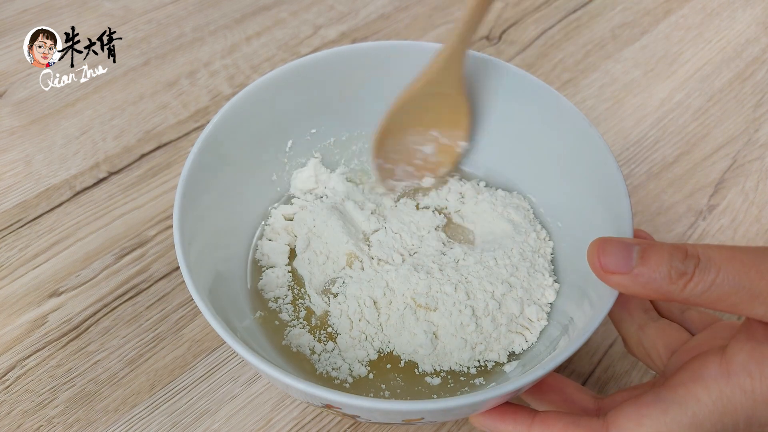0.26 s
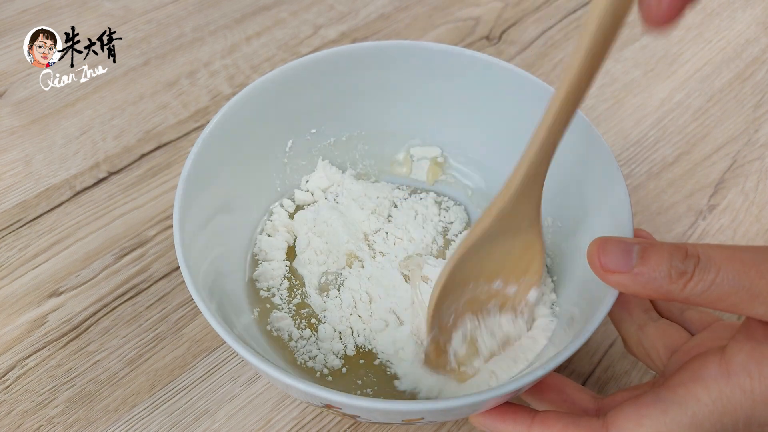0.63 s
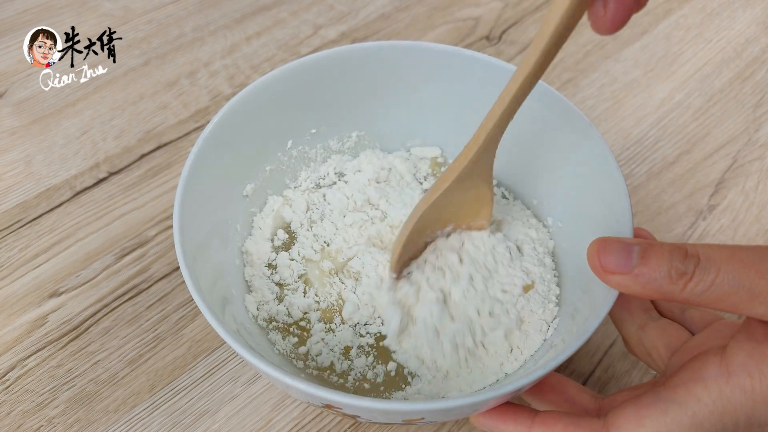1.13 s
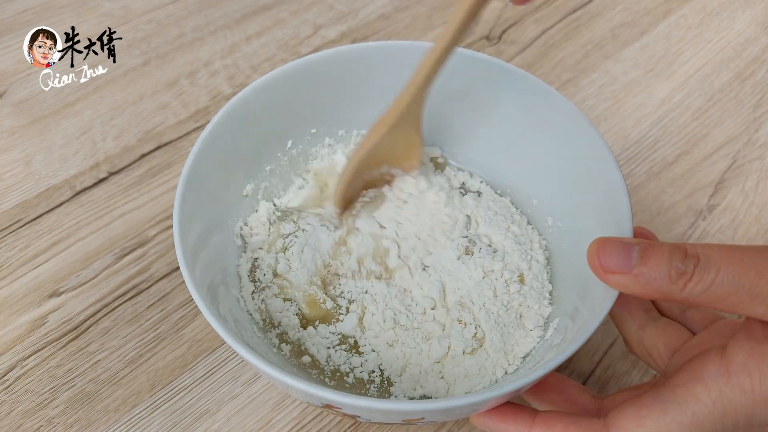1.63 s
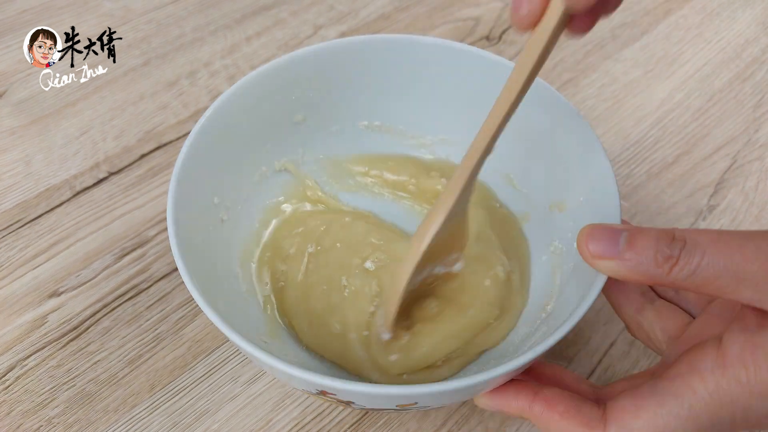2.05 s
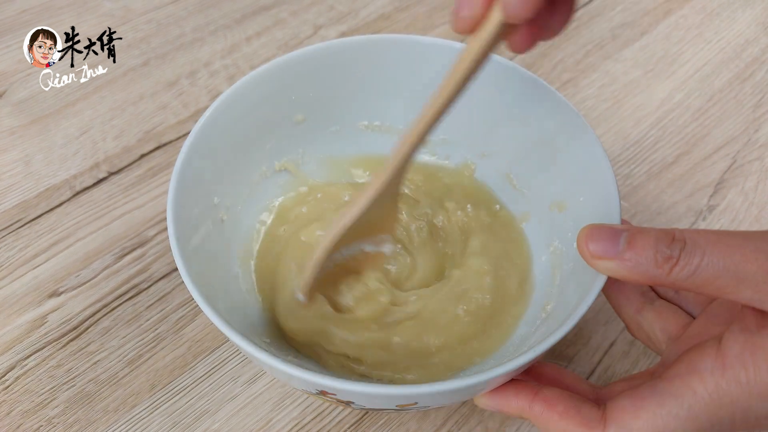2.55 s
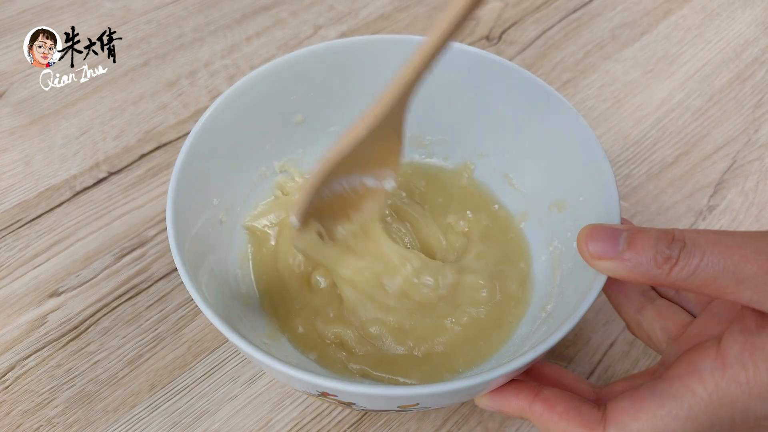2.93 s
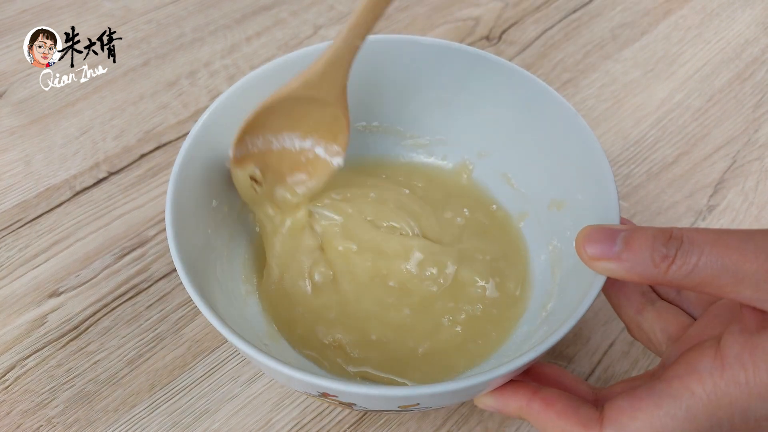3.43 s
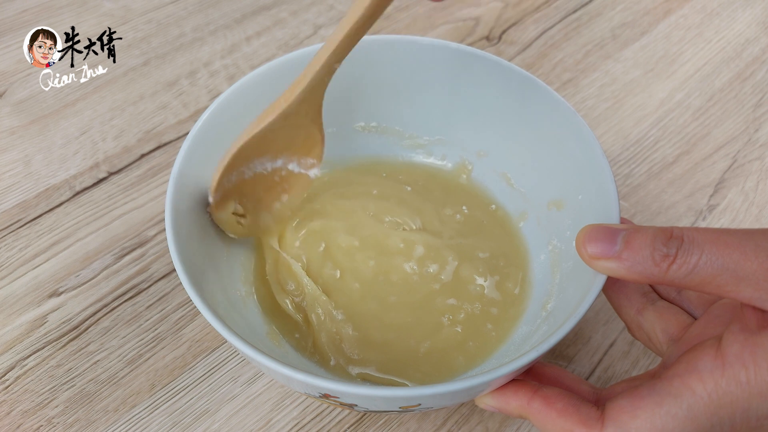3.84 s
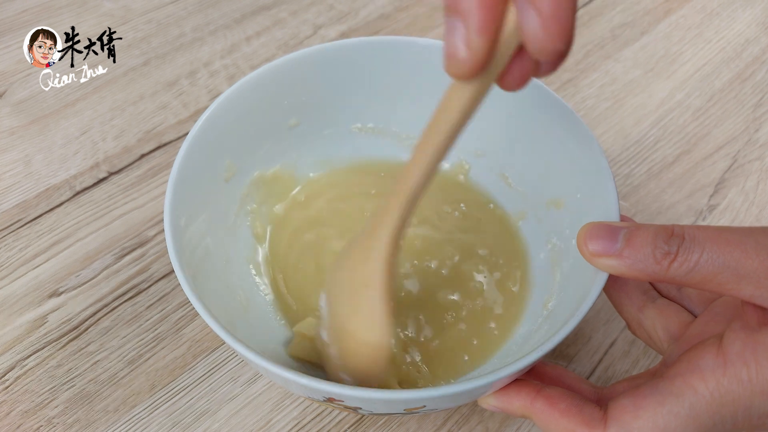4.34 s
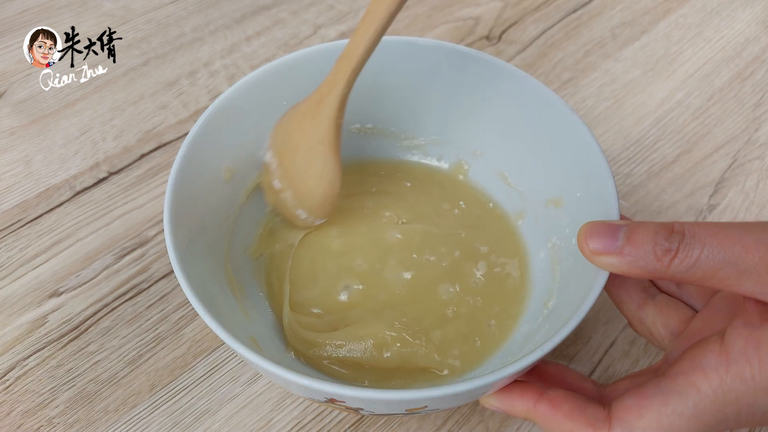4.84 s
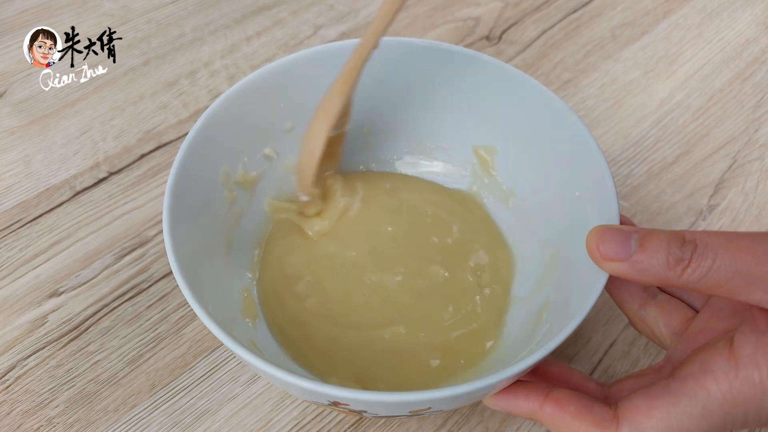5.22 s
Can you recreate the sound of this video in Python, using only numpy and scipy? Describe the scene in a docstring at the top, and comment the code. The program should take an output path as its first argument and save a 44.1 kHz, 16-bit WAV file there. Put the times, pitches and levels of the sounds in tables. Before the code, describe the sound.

A wooden spoon stirs flour into oil in a ceramic bowl, close by, over a faint kitchen hum. Quick gritty scrapes come first, with a light double tap. Then the mixture turns to paste, giving tiny wet pops, while the spoon knocks now and then on the bowl's wall. The stirring slows to longer folding strokes, and the hardest knock falls shortly before the end.

```python
"""A wooden spoon stirs flour into oil in a ceramic bowl on a wooden table, in a humming kitchen.
From the start, quick strokes grind grit on the glaze; stick-slip friction rings spoon, bowl and table.
A light double tap follows, then the first of scattered knocks on the bowl's wall, low thumps and catches.
From about 2 s small bubbles pop in the paste. Near 3 s the stirring slows to folding, with two brief
hums under the drag, and the hardest knock falls shortly before the end."""
import sys
import numpy as np
from scipy import signal
from scipy.io import wavfile
from scipy.ndimage import uniform_filter1d

SR = 44100
rng = np.random.default_rng(int(sys.argv[2]) if len(sys.argv) > 2 else 0)


def bounce(signal):
    """Save signal as a 16-bit WAV file at the path given by the first command-line argument."""
    frames = np.transpose(np.atleast_2d(signal))
    limited = np.clip(frames, -1, 1)
    pcm = np.round(limited * 32767).astype(np.int16)
    wavfile.write(sys.argv[1], SR, pcm)


N = 241403
TIME = np.arange(N) / SR
CONTROL_TIME = TIME[::16]
SLOW_FROM_S, PASTE_FROM_S = 2.95, 2.1

# Kitchen noise spectrum: (frequency [Hz], relative density [dB])
KITCHEN_SPECTRUM = [(34, -1), (52, 18), (61, 5), (161, -4), (362, 3), (483, -1.5), (981, -2.5), (1700, -10),
                    (7010, -12.5), (12800, -17.5), (15800, -20.5)]
# Strokes on the glaze: (time [s], hold [s], grit level [dB], rise [ms], swell over the hold [dB],
# blade [dB re grit], table [dB re grit], bowl [dB re grit], treble tilt [dB/octave], rasp [Hz])
STROKES = [(0.025, 0.079, -32.5, 120, -2.5, -6, -13, -27, 1.5, 4000),
           (0.329, 0.078, -45, 15, 9, -18, -16, -32, 4.5, 4800),
           (0.479, 0.061, -40, 270, -0.5, -8, -19, -25, -0.5, 3400),
           (0.82, 0.047, -35, 9.6, 1, -8.5, -12.5, -25, -0.5, 5140),
           (1.181, 0.037, -27, 78, -2, -9, -13.5, -34, -2, 3680),
           (1.464, 0.025, -34.5, 33, 4, -8.5, -9, -39, 0.5, 3850),
           (1.796, 0.056, -28, 100, 4, -6, -13.5, -21, -0.5, 4100),
           (2.008, .016, -42, 5, 1.5, -11, -21, -40, -4, 2970),
           (2.203, 0.021, -28.5, 16.4, -3, -1.5, -7, -25, -1, 4140),
           (2.508, 0.031, -33, 3.3, -0.5, 3.5, -14, -11, -2.5, 3980),
           (2.555, 0.025, -36, 30, 4.5, -7, -2.5, -22, -4.5, 4350),
           (2.602, 0.23, -44, 37, -14.5, 2, -3, -9, -3, 4200),
           (2.889, 0.05, -26, 3.8, -4, -6.5, -9.5, -21, -2.5, 3840),
           (2.97, 0.27, -45, 70, -1.5, -40, -6, -24, -11.5, 4300),
           (3.259, 0.094, -29.5, 60, -2.5, -9, -23, -29, -8.5, 4400),
           (3.392, 0.037, -28.5, 110, -2.5, -5, -15, -9, -1.5, 5500),
           (3.444, 0.2, -38.5, 73, 2, -40, 2, -20, -8.5, 4500),
           (3.659, 0.15, -27.5, 63, 1, -3.5, -35, -26, -2.5, 3970),
           (3.863, 0.12, -36, 220, -8, -37, -22, -29, -5.5, 4100),
           (3.979, .22, -33.5, 4, 4.5, 0, -11, -17, -1.7, 3140),
           (4.393, 0.025, -43.5, 16, -1.5, -12, -3, -16, 0, 5400),
           (4.435, 0.12, -33.5, 65, -5, -0.5, -13.5, -19, -0.7, 4530),
           (4.566, 0.027, -38.5, 71, 2.5, -7, -14, -1.5, -2, 5950),
           (4.801, 0.057, -29, 1.2, -1, -25, -0.5, -26, -2, 4030),
           (4.945, 0.13, -29, 127, -0.5, -6.5, -24, -36, 0.3, 5340),
           (5.087, 0.018, -31.5, 220, -1, -16, -16.5, -3, -5.5, 4170),
           (5.304, 0.079, -42, 16, 2, -40, -3.5, -11, -6, 3940),
           (5.391, 0.11, -31.5, 47, 11, -7.5, -15.5, -13, -0.4, 4000)]
# Friction noise spectrum: (frequency [Hz], relative density [dB])
GRIT_SPECTRUM = [(300, -16), (550, -10.5), (1100, -11.5), (2900, -8.5), (3800, -7), (5400, -5),
                 (7200, -1.5), (8100, -4), (9200, -10), (11500, -8.5), (14500, -16), (15800, -18),
                 (16100, -52)]
# Spoon modes, one of the handle, then two of the blade: (frequency [Hz], bandwidth [Hz], level [dB])
SPOON_MODES = [(1050, 267, 7), (1672, 192, 2), (1962, 178, 0.5)]
# Modes of bowl, table top and the table swaying on its legs: (frequency [Hz], level [dB], t60 [s])
BOWL_MODES = [(921, 0, 0.17), (931, -3, 0.17), (2252, -11, 0.3), (3930, 1, 0.36), (3940, 0, 0.36),
              (4790, -5, .12), (5940, -2, 0.045)]
TABLE_MODES = [(226, 0, 0.17), (259, -7, 0.25), (291, 0, 0.22), (366, -9, 0.07), (543, -6, 0.09),
               (730, -11, .06)]
LEG_MODES = [(68.6, 1, 0.25), (132.5, 2, 0.12), (162.3, -7.5, 0.37)]
# Reverberation time of the room: (frequency [Hz], t60 [s])
ROOM_DECAY = [(1000, 0.22), (12000, 0.05)]
# A contact and its bounce: (time [s], peak level [dB])
TAPS = [(0.2877, -24.5), (0.29, -24)]
# Modes rung by a tap: (frequency [Hz], level [dB], t60 [s])
TAP_MODES = [(1120, -0.81, 0.022), (3470, -0.68, 0.014)]
# Spoon impacts: (time [s], spoon peak [dB], table peak [dB], bowl peak [dB], legs peak [dB], contact [ms])
KNOCKS = [(0.33, -35, -38, -63, -31.5, 0.21), (2.006, -34, -59, -37.5, -59, 0.32),
          (2.206, -19, -30.5, -47, -27.5, 0.18), (2.512, -18, -21, -50, -22.5, 0.17),
          (2.891, -30, -25, -54, -24.5, 0.48), (2.9877, -13.5, -41, -56, -38, 0.18),
          (3.519, -28, -7.5, -34, -40, 0.51), (3.9811, -23, -20.5, -23, -42, 0.15),
          (4.802, 2, -13.5, -13, -30, 0.13), (5.107, -21, -53, -53, -46, 0.24),
          (5.303, -25, -37, -71, -42, 0.75)]
# Low thumps: (time [s], peak level [dB], frequency [Hz])
THUMPS = [(0.344, -24.5, 59), (2.821, -29, 60), (5.19, -27, 60)]
# Jolts of the blade as its edge catches: (time [s], peak level [dB])
CATCHES = [(1.1868, -18), (1.2255, -33), (2.2179, -20), (2.574, -24), (2.5839, -20.5), (2.8894, -21),
           (2.916, -15.5), (3.7713, -13), (4.1696, -15)]
# Mean rate of faint bubble bursts: (time [s], rate [1/s])
FIZZ_RATE = [(1.95, 0.47), (2.05, 146), (3.3, 220), (3.6, 10)]
# Distinct bubble bursts: (time [s], peak level [dB], frequency [Hz], rise to peak [cycles])
POPS = [(2.0199, -12.5, 11000, 0.79), (2.0845, -27, 12300, 2.3), (2.1099, -15.5, 7040, 1.1),
        (2.1583, -15, 7400, 1.5), (2.189, -18, 7400, 2.4), (2.2605, -18.5, 6200, 0.9),
        (2.299, -18, 12600, 0.55), (2.3136, -21.5, 4230, 0.68), (2.5728, -15.5, 12200, 1.8),
        (2.6315, -14.5, 12000, 0.6), (2.6962, -26, 9000, 0.71), (2.7354, -11.5, 8460, 1),
        (2.762, -13.5, 7700, 0.33), (2.9634, -12, 7550, 2.2), (2.9784, -7.5, 8140, 2.9),
        (2.9832, -4, 4580, 2), (2.9871, -1.5, 4400, 0.91), (3.1343, -22.5, 7150, 1.8),
        (3.219, -22.5, 7300, 1.1), (3.386, -4, 7800, 1.1), (3.7172, -7.5, 6760, 1.1),
        (3.806, -9, 13100, 1.5), (4.2504, -17, 10870, 1.5), (4.6319, -10, 13900, 0.73),
        (4.961, -5, 7700, 1.04), (5.0534, 4, 7660, 1.83), (5.4218, -9, 7930, 2.2)]
# Thin tones under the slow drag: (time [s], duration [s], frequency [Hz], level [dB])
HUMS = [(3.228, 0.13, 974, -33.5), (3.277, 0.17, 252, -38.5)]


def gain_of(db):
    """Amplitude ratio: tenfold for every 20 dB."""
    return 10 ** (np.asarray(db) / 20)


def unit_rms(x):
    """Normalisation to unit mean power."""
    return x / np.sqrt(np.mean(x ** 2) + 1e-20)


def at_peak(db, sound):
    """Normalisation to a given peak level."""
    return gain_of(db) * sound / abs(sound).max()


def curve_at(points, hz):
    """Interpolation on a logarithmic frequency axis."""
    frequency, value = np.transpose(points)
    return np.interp(np.log(hz + 1), np.log(frequency + 1), value)


def add(mix, start_s, sound):
    """Superposition: a sound sums into the mix from its onset."""
    part = mix[round(start_s * SR):][:len(sound)]
    part += sound[:len(part)]


def ringing(modes, length_s, turn=-1):
    """Modal impulse response: damped sinusoids, the k-th weighted by turn ** k."""
    t = np.arange(round(length_s * SR)) / SR
    return sum(turn ** k * gain_of(db - 60 * t / t60) * np.sin(2 * np.pi * hz * t)
               for k, (hz, db, t60) in enumerate(modes))


def wood(modes, turn):
    """Damped wood: each mode's decay time is inversely proportional to its bandwidth."""
    return ringing([(hz, db, np.log(1000) / np.pi / width) for hz, width, db in modes], .04, turn)


def kitchen():
    """Spectrally shaped noise: a steady background and low hum whose bands drift a little."""
    frames, hz = N // 512 + 5, np.fft.rfftfreq(2048, 1 / SR)
    real, imaginary, drift = rng.standard_normal((frames, 1025, 3)).T
    drift = unit_rms(uniform_filter1d(uniform_filter1d(drift, 20, 0), 8, 1))
    spectrum = (real + 1j * imaginary) * gain_of(curve_at(KITCHEN_SPECTRUM, hz)[:, None] + 0.98 * drift)
    return gain_of(-48) * unit_rms(signal.istft(spectrum, nperseg=2048, noverlap=1536)[1][:N])


def stroke_envelopes():
    """Sliding contact: each stroke's amplitude rises, swells or sags, and decays as the edge lifts."""
    start, hold, level_db, rise_ms, swell_db = np.transpose(STROKES)[:5, :, None]
    t = CONTROL_TIME - start
    rise_db = 30 * 1000 / rise_ms * np.minimum(t, 0)
    since_lift = np.maximum(t - hold, 0)
    lift_db = np.where(start < SLOW_FROM_S, 797, 365) * since_lift  # slow strokes trail off longer
    smear_db = 11 + 130 * since_lift  # clinging paste leaves a faint tail
    fall_db = np.where(start < PASTE_FROM_S, lift_db, np.minimum(lift_db, smear_db))
    return gain_of(level_db + swell_db * np.clip(t / hold, 0, 1) + rise_db - fall_db)


def slips(per_s, spread_db, judder_db, judder_ms):
    """Stick-slip friction: dense random impulses of uneven size whose strength stutters."""
    hit = rng.random(N) < per_s / SR
    size = gain_of(spread_db * np.minimum(rng.exponential(1, N), 5)) * rng.standard_normal(N)
    span = round(judder_ms * SR / 1000)
    judder = unit_rms(uniform_filter1d(uniform_filter1d(rng.standard_normal(N), span), span))
    return unit_rms(hit * size * gain_of(judder_db * judder))


def grit(power):
    """Friction noise: fine slips, coloured by each stroke in proportion to its power."""
    fine = slips(per_s=14000, spread_db=2.1, judder_db=1.3, judder_ms=5)
    hz, t, spectrum = signal.stft(fine, SR, nperseg=256)
    tilt, rasp_hz = (np.interp(t, CONTROL_TIME, np.sum(column * power, 0) / power.sum(0))
                     for column in np.transpose(STROKES)[8:, :, None])
    octaves = np.log2((hz[:, None] + 1) / rasp_hz)
    peak_db = 5 * np.exp(-(octaves / .2) ** 2)
    dip_db = -4.5 * np.exp(-((octaves - np.log2(1.4)) / .2) ** 2)
    rasp_db = (peak_db + dip_db) * np.where(t < SLOW_FROM_S, 1, .5)
    tilt_db = np.log2(np.maximum(hz, 2500) / 6000)[:, None] * tilt
    colour = gain_of(curve_at(GRIT_SPECTRUM, hz)[:, None] + tilt_db + rasp_db)
    colour /= np.sqrt(np.mean(colour ** 2, 0))
    drift = rng.standard_normal(spectrum.shape[::-1]).T  # contact spots move, so the colour drifts
    drift = unit_rms(uniform_filter1d(uniform_filter1d(drift, 6, 0), 8, 1))
    return unit_rms(signal.istft(spectrum * colour * gain_of(2.5 * drift), SR, nperseg=256)[1][:N])


def stirring():
    """Forced vibration: grit hisses under the edge while coarser slips drive spoon, table and bowl."""
    power = stroke_envelopes() ** 2 + 1e-30
    start, hold, *_, blade_db, table_db, bowl_db, tilt, _ = np.transpose(STROKES)[:, :, None]

    def drive(db):
        """Incoherent summation: the weighted strokes add in power."""
        return np.interp(TIME, CONTROL_TIME, np.sqrt(np.sum(gain_of(db) ** 2 * power, 0)))

    out = drive(0) * grit(power)
    coarse = slips(per_s=2500, spread_db=2.5, judder_db=2.2, judder_ms=4)
    blade = wood(SPOON_MODES[1:], turn=-1)
    hollow = np.convolve(blade, blade * gain_of(-4000 * TIME[:len(blade)]))  # narrows the two modes
    build_s = 0.67 * hold  # the blade's hollow builds to its full ring at 115 dB/s
    hollow_db = blade_db - 115 * np.clip(start + build_s - CONTROL_TIME, 0, build_s)
    table = ringing(TABLE_MODES, .5) + gain_of(-2.5) * ringing(LEG_MODES, .5)
    bowl = ringing(BOWL_MODES, .4) * gain_of(-250 * TIME[:round(.4 * SR)])
    soft_bowl = np.convolve(bowl, np.hanning(round(.45 * SR / 1000)))  # the soft wooden edge rounds off each contact
    handle = wood(SPOON_MODES[:1], turn=1)
    handle_db = -17 - 1.17 * tilt  # a dull, dragging contact bends the handle more
    for body, db in (hollow, hollow_db), (table, table_db), (soft_bowl, bowl_db), (handle, handle_db):
        out += signal.oaconvolve(coarse * drive(db), body / np.linalg.norm(body))[:N]
    return out


def reverberation(x):
    """Diffuse reflection: sparse echoes of random sign, the treble decaying fastest."""
    echoes = np.zeros(SR // 2)
    slots = np.arange(100, len(echoes) - 20, 20)
    echoes[slots + rng.integers(0, 20, len(slots))] = rng.choice([-1., 1.], len(slots))
    hz, t, spectrum = signal.stft(echoes, SR, nperseg=256)
    decay = gain_of(-60 * t / curve_at(ROOM_DECAY, hz)[:, None])
    tail = signal.istft(spectrum * decay, SR, nperseg=256)[1]
    return signal.oaconvolve(x, tail / np.linalg.norm(tail))[:N]


def taps():
    """Rebound: a small hard contact bounces once and rings the same modes twice."""
    out, ring = np.zeros(N), ringing(TAP_MODES, .06)
    for start, db in TAPS:
        add(out, start, at_peak(db, ring))
    return out


def knocks():
    """Impact: a force pulse excites spoon, table top, bowl and legs; longer contact gives less treble."""
    out = np.zeros(N)
    top = signal.lfilter(*signal.butter(2, 150, "high", fs=SR), ringing(TABLE_MODES, .5, turn=0.9))
    bodies = wood(SPOON_MODES, turn=1), top, ringing(BOWL_MODES, .44, turn=0.78), ringing(LEG_MODES, .32)
    for start, *levels, contact_ms in KNOCKS:
        push = -np.hanning(round(contact_ms * SR / 1000) + 2)
        for body, db in zip(bodies, levels):
            add(out, start, at_peak(db, signal.oaconvolve(body, push)))
    return out


def thumps():
    """Heavily damped oscillation: a downward step swings back and settles within a cycle or two."""
    out, t = np.zeros(N), np.arange(4000) / SR
    for start, db, hz in THUMPS:
        add(out, start, -gain_of(db) * np.exp(-t * hz / 0.27) * np.cos(2 * np.pi * hz * t))
    return out


def catches():
    """Free vibration: the edge catches and jumps, leaving the blade to ring briefly."""
    out, blade = np.zeros(N), wood(SPOON_MODES[1:], turn=-1.1)
    for start, db in CATCHES:
        add(out, start, at_peak(db, blade))
    return out


def pop(db, hz, cycles):
    """Film rupture: a bubble gives a few cycles that swell fast and die slower, with a weak overtone."""
    turns = TIME[:400] * hz
    overtone = gain_of(-9.5) * np.sin(2 * np.pi * min(1.6, 15000 / hz) * turns)
    envelope = turns ** 2 * np.exp(-2 * turns / cycles)
    return at_peak(db, envelope * (np.sin(2 * np.pi * turns) + overtone))


def bubbles():
    """Bursting bubbles: distinct pops stand over a faint fizz, a random point process of varying rate."""
    out = np.zeros(N)
    for start, db, hz, cycles in POPS:
        add(out, start, pop(db, hz, cycles))
    position, draw, size, pitch = rng.random((1200, 4)).T
    starts = position * N / SR
    chance = np.interp(starts, *np.transpose(FIZZ_RATE)) * N / SR / len(starts)
    for k in np.flatnonzero(draw < chance):
        add(out, starts[k], pop(db=-44 + 18 * size[k] ** 2, hz=5500 * 2.6 ** pitch[k], cycles=1.2))
    return out


def hums():
    """Amplitude modulation: thin tones swell, waver slightly and fade."""
    out = np.zeros(N)
    for start, length, hz, db in HUMS:
        t = np.arange(0, length, 1 / SR)
        waver = unit_rms(uniform_filter1d(rng.standard_normal(N // 8), 900))[:len(t)]
        envelope = gain_of(db + 2 * waver) * np.sin(np.pi * t / length) ** .5
        add(out, start, envelope * np.sin(2 * np.pi * hz * t))
    return out


def scene():
    """Superposition of direct sound, reverberation, thumps and background, equal on both channels."""
    direct = stirring() + knocks() + taps() + bubbles() + catches() + hums()
    mono = direct + gain_of(-14) * reverberation(direct) + thumps() + kitchen()
    return np.array([mono, mono])


def record(dry):
    """Band limiting and saturation: the microphone loses deep bass, clips peaks and cuts the top treble."""
    thin = signal.sosfilt(signal.butter(4, 48, "high", fs=SR, output="sos"), dry)
    lowpass = signal.firwin(511, 16365, window=("kaiser", 9), fs=SR)
    return signal.oaconvolve(np.clip(thin, -1, 1), lowpass[None], "same")


dry = scene()
out = record(dry)
bounce(out)
```